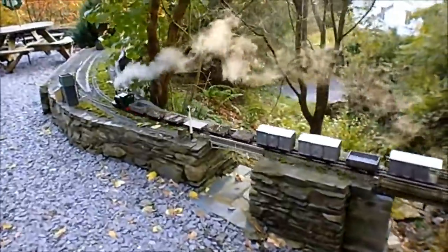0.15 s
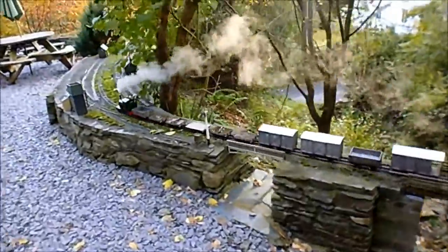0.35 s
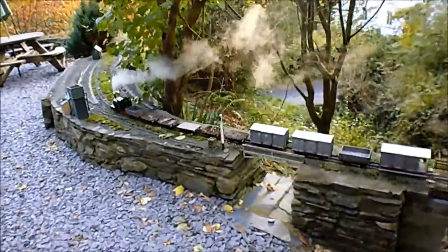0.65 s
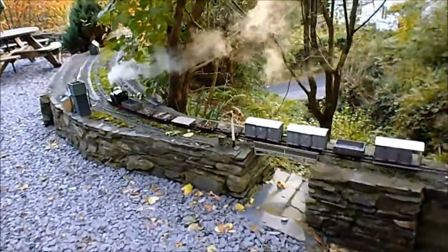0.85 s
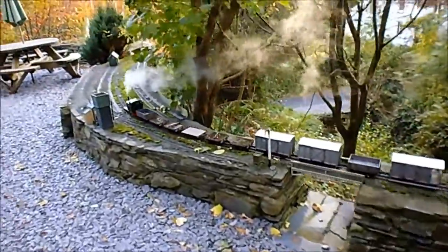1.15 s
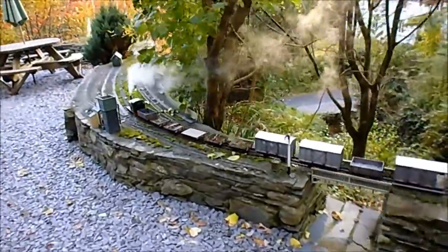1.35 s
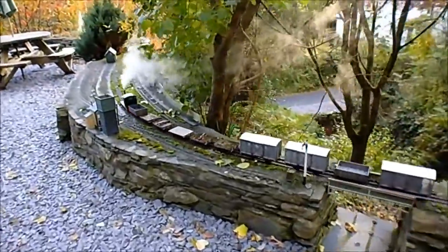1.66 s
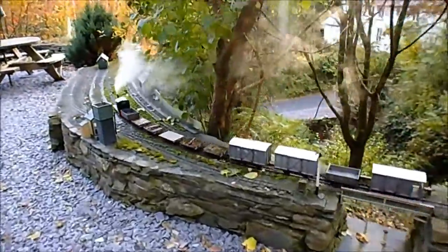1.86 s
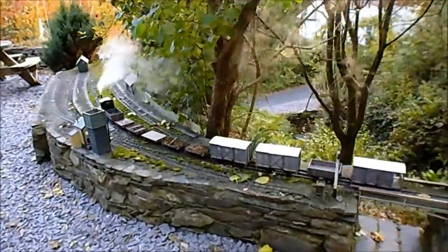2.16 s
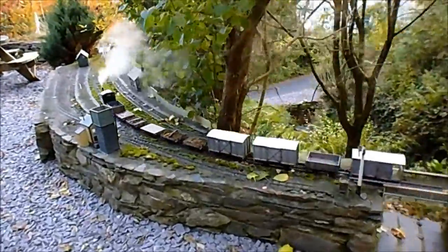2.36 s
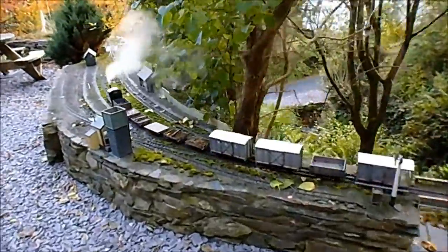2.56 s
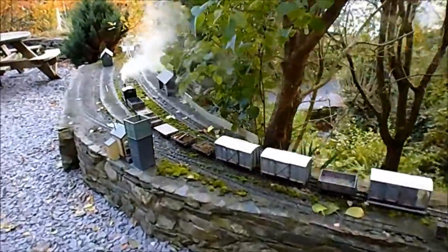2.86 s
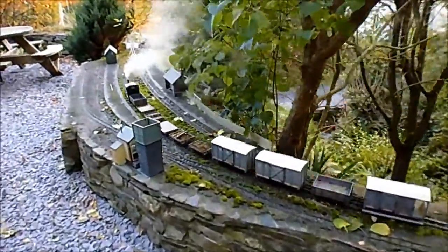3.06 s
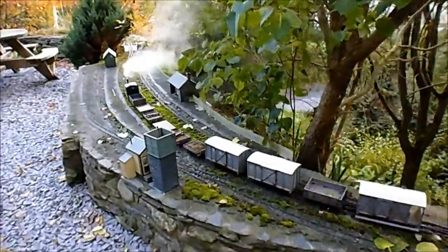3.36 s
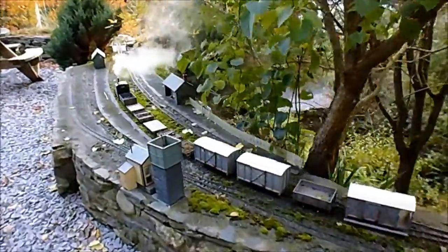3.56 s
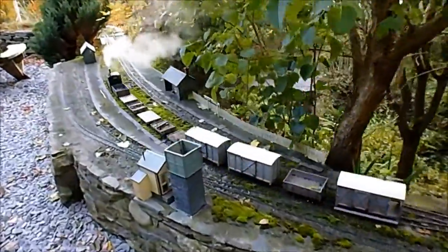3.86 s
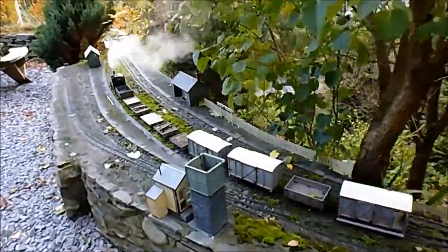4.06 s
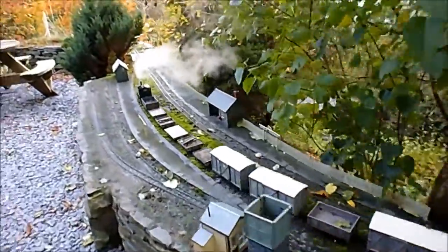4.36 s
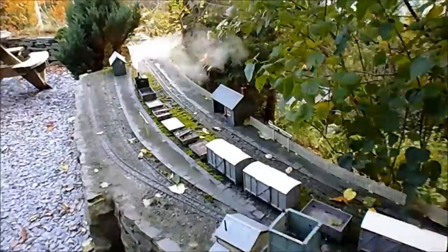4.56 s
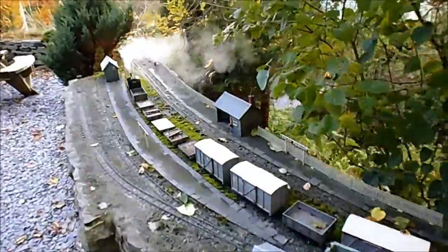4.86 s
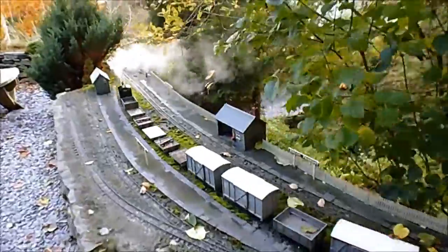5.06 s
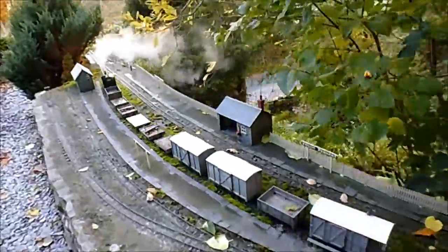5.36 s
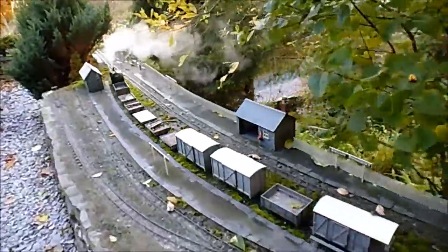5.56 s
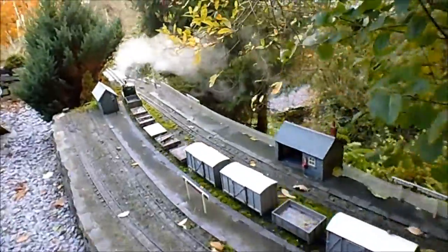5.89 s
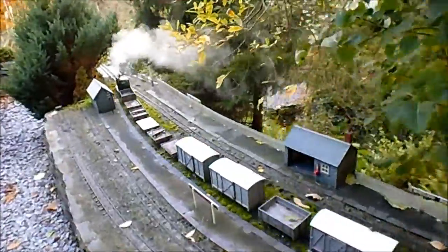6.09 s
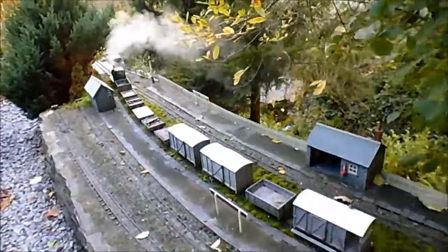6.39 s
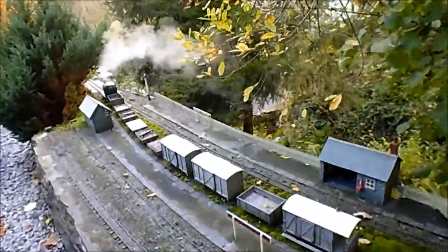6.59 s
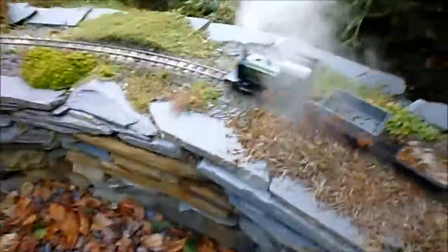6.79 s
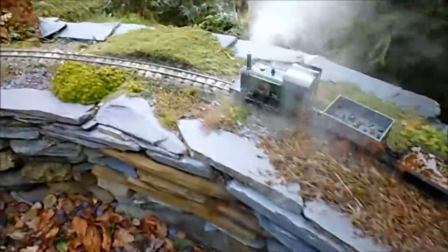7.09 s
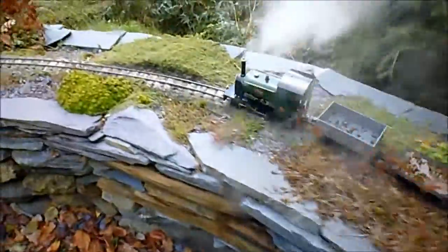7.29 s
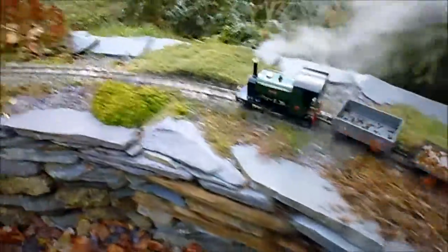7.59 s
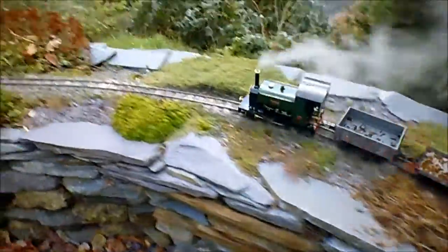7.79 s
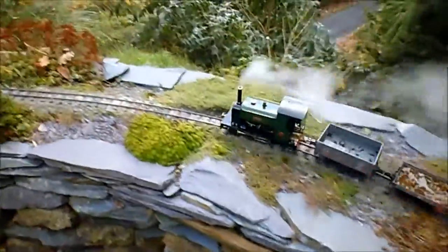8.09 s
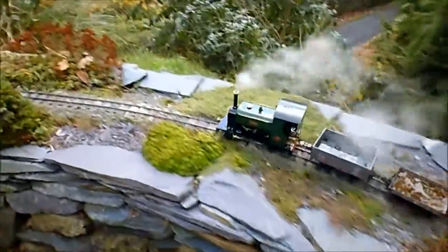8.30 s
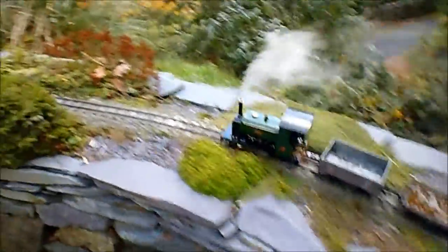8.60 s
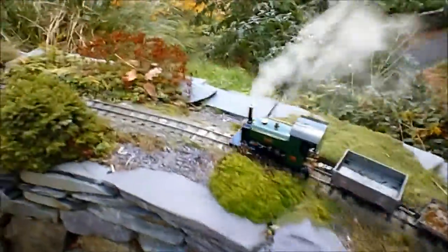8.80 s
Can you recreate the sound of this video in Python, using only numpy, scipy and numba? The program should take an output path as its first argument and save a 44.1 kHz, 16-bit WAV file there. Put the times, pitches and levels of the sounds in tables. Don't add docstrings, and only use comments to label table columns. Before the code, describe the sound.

Outdoors, a small live-steam engine gives a wavering, hollow burner hum with steady steam hiss. Light wheel ticks, metallic clicks and boxy wagon knocks grow dense as the wagons pass near the handheld microphone, with the track bed thumping. At about 6.7 seconds the scene cuts abruptly to the engine close up: stronger burner tone, whistling steam and small rod clicks, without the heavy knocking.

```python
import sys
import numpy as np
from scipy import signal
from scipy.fft import rfft, irfft, next_fast_len
from scipy.io import wavfile
from scipy.ndimage import uniform_filter1d
from numba import njit

SR = 44100
rng = np.random.default_rng(int(sys.argv[2]) if len(sys.argv) > 2 else 0)


def gain_from_db(level_db):
    decades = np.asarray(level_db, float) / 20
    return 10 ** decades


def wrap_up_sound(samples):
    columns = np.atleast_2d(samples).T
    tamed = np.clip(columns, -1, 1)
    steps = np.round(tamed * 32767).astype(np.int16)
    wavfile.write(sys.argv[1], SR, steps)


N = 394254
CUT_S = 6.712


def unit(x):
    return x / np.sqrt(np.mean(x ** 2))


def column(tables, k):
    t = np.arange(N) / SR
    far, near = (np.interp(t, np.array(c)[:, 0], np.array(c)[:, k]) for c in tables)
    return np.where(t < CUT_S, far, near)


def lowpass(x, order, hz):
    return signal.sosfilt(signal.butter(order, hz, fs=SR, output="sos"), x)


@njit
def svf(x, hz, width):
    y, band, low = np.empty(len(x)), 0., 0.
    for i in range(len(x)):
        g, k = np.tan(np.pi * hz[i] / SR), width / hz[i]
        v = (band + g * (x[i] - low)) / (1 + g * (g + k))
        band, low, y[i] = 2 * v - band, low + 2 * g * v, k * v
    return y


def ring(x, hz, width):
    hz = hz + np.zeros(len(x))
    each = width / np.sqrt(np.sqrt(2) - 1)
    return svf(svf(x, hz, each), hz, each)


def walk(rate):
    k = int(SR / rate)
    held = np.repeat(rng.standard_normal(N // 400), k)[:N]
    return unit(uniform_filter1d(uniform_filter1d(held, k), k))


def coloured(shape, flicker_db, rate):
    hz, db = np.transpose(shape)
    size = next_fast_len(N)
    f = np.maximum(np.arange(size // 2 + 1) * SR / size, 1)
    spec = rfft(rng.standard_normal(size)) * gain_from_db(np.interp(np.log(f), np.log(hz), db, right=-120))
    place = np.log2(f / hz[0]) * 2
    bands = [irfft(spec * np.clip(1 - abs(place - k), 0, 1), size)[:N] for k in range(10)]
    return unit(sum(b * gain_from_db(flicker_db * walk(rate)) for b in bands))


def ticks(rows, t60=0.023):
    rise_s = 0.002564
    out, t = np.zeros(N + 2048), np.arange(2048) / SR
    noise = rng.standard_normal((len(rows), 2048))
    for (s, db, hz, width), n in zip(rows, noise):
        burst = n * (1 - np.exp(-(t / rise_s) ** 2)) * np.exp(-np.log(1000) * t / t60)
        tick = ring(burst, hz, 1.46 * np.clip(width, .1, 2) * hz)
        start = int((s - rise_s / 2) * SR) % N
        out[start:start + 2048] += gain_from_db(db) * tick / abs(tick).max()
    return out[:N]


def blows(rows, rise_s, grit, crack):
    out, t = np.zeros(N + 8192), np.arange(8192) / SR
    noise = rng.standard_normal((len(rows), 8192))
    for (s, db, hz, t60, upper_hz, upper_db), n in zip(rows, noise):
        fade = np.exp(-np.log(1000) * t / max(t60, .004))
        force = grit * n * fade - (t == 0)
        lower = fade * np.sin(2 * np.pi * hz * t)
        upper = gain_from_db(upper_db) * fade ** 2 * np.sin(2 * np.pi * upper_hz * t)
        body = signal.fftconvolve(force, (lower + upper) * (1 - np.exp(-t / rise_s)))[:8192]
        body = np.diff(body, prepend=0)
        contact = crack * ring(n, 1.06 * hz, 0.86 * hz) * fade
        body = body / abs(body).max() + contact
        start = int(s * SR)
        out[start:start + 8192] += gain_from_db(db) * body / abs(body).max()
    return out[:N]


# t/s, level/dB, second flue tone over the first level/dB
FLAME_CURVES = [
    [(0.0, -35, -11), (0.5, -33, -6), (0.99, -36.5, -1.5), (1.57, -35, 3), (2.7, -34, -2.5),
     (2.99, -41.5, 5), (3.3, -37, -0.5), (4.2, -34.5, 0.5), (4.61, -32, -4), (5.0, -33, -2.5),
     (5.56, -33.5, -4), (5.95, -39, 0), (6.7, -42, -1.5)],
    [(6.72, -26.5, -6), (7.59, -29, -7), (7.94, -27.5, -4.5), (8.69, -26.5, -12), (8.94, -30, -17)],
]
# t/s, closeness of wagons level/dB, steam flow level/dB
TRAIN_CURVES = [
    [(0.0, 2, -1.5), (0.55, 2.5, -1.5), (0.88, -2, -1), (1.3, 0, 0.5), (2.39, 1.5, -2), (2.67, 1.5, 2.5),
     (3.0, 2.5, -2.5), (3.47, 2.5, 3.5), (3.97, 3, 0.5), (4.5, 4.5, 1), (5.06, 6.5, 3.5), (5.5, 4, 4),
     (6.1, 9.5, 5), (6.7, 8, 2.5)],
    [(6.72, 4, -3.5), (7.0, -0.5, -0.5), (7.7, 2.5, 0.5), (8.94, 2.5, 0.5)],
]
# f/Hz, level/dB (per Hz)
ROAR_SHAPE = [(200, -1), (400, -5.5), (600, 5), (1000, 3), (1400, 0), (1600, -24.5), (2200, -27),
              (4000, -43)]


def burner():
    width_hz = 43.8
    flame_db = column(FLAME_CURVES, 1)
    far = np.arange(N) / SR < CUT_S
    first_far = ring(rng.standard_normal(N), 786.6 * (1 + 0.007 * walk(14)), width_hz)
    first_near = ring(rng.standard_normal(N), 802.7 * (1 + 0.0119 * walk(4.4)), 1.17 * width_hz)
    first = unit(np.where(far, unit(first_far), unit(first_near)))
    second_hz = np.where(far, 1348, 1366) * (1 + 0.0054 * walk(9))
    second = unit(ring(rng.standard_normal(N), second_hz, 74.5))
    flue = first * gain_from_db(flame_db + 0.56 * walk(5.7))
    flue = flue + second * gain_from_db(flame_db + column(FLAME_CURVES, 2) + 1.3 * walk(12))
    roar_db = np.where(far, -36.5, -34) + 0.12 * column(TRAIN_CURVES, 1) + 0.69 * column(TRAIN_CURVES, 2)
    return flue + coloured(ROAR_SHAPE, 1.9, 14) * gain_from_db(roar_db)


# f/Hz, level/dB (per Hz)
HISS_SHAPE = [(900, -41), (1500, 9.5), (2000, 1.5), (2700, 2.5), (4700, -0.5), (6500, 1.5), (7600, -8.5),
              (9500, 4.5)]
# f/Hz, width f/Hz, far level/dB, near level/dB
JET_WHISTLES = [(2250, 100, -20, -14), (3080, 170, -14, -6.5), (5200, 120, -19, -15), (5830, 170, -15, -5),
                (6300, 350, -15, -8), (7300, 250, -16, -16)]
# t/s, length t/s, level/dB over the hiss
SPURTS = [(0.385, 0.052, 7.5), (0.47, 0.061, 8), (1.208, 0.047, 6), (1.87, 0.054, 9), (1.99, 0.043, 6),
          (3.093, 0.037, 5), (3.397, 0.059, 2), (3.482, 0.028, 6), (3.986, 0.041, 9.5), (4.23, 0.26, 4),
          (4.607, 0.035, 4.5), (7.006, 0.017, 7), (7.614, 0.057, 2)]
# t/s, f/Hz, level/dB, length t/s
FADING_WHISTLES = [
    (0, 5220, -52, .75),
    (0, 3120, -55, 1.3),
    (0, 5840, -54, 2.3),
    (6.712, 2710, -50, .9),
]


def steam():
    t = np.arange(N) / SR
    puffs_db = 0.9 * walk(45)
    for s, length, db in SPURTS:
        puffs_db = puffs_db + db * np.exp(-((t - s) / (length / 2)) ** 2)
    hiss = coloured(HISS_SHAPE, 1.2, 30)
    for hz, width_hz, far_db, near_db in JET_WHISTLES:
        tone = unit(ring(rng.standard_normal(N), hz * (1 + 0.007 * walk(8)), float(width_hz)))
        flutter_db = 1.5 * (walk(40) + walk(8))
        hiss = hiss + tone * gain_from_db(np.where(t >= CUT_S, near_db, far_db) + flutter_db)
    out = hiss * gain_from_db(-43.5 + column(TRAIN_CURVES, 2) + puffs_db)
    for s, hz, db, length in FADING_WHISTLES:
        tone = unit(ring(rng.standard_normal(N), hz, 120.)) * gain_from_db(db)
        out = out + tone * (t >= s) / (1 + ((t - s) / length) ** 4)
    return out


# f/Hz, level/dB (per Hz)
AIR_SHAPE = [(10, 1.5), (25, -1), (50, -3.5), (80, -4), (130, -13), (300, -33)]


def outdoor_air():
    return coloured(AIR_SHAPE, 1.4, 4.1) * gain_from_db(-49.5)


# f/Hz, level/dB (per Hz)
BED_SHAPE = [(60, -27.5), (110, -7.5), (185, -2.5), (250, -4.5), (330, -4.5), (420, -5.5), (520, -7.5),
             (900, -39.5)]


def bed_drumming():
    return coloured(BED_SHAPE, 2.5, 14) * gain_from_db(-42 + column(TRAIN_CURVES, 1))


def rattle():
    per_s = 130
    pick = rng.random((1400, 3))
    s = np.cumsum(-np.log(pick[:, 0]) / per_s)
    size_db = np.minimum(-41 - 4.5 * np.log(pick[:, 1]), -29)
    rows = np.c_[s, size_db, 1500 * 5 ** pick[:, 2], np.full(len(s), .6)]
    return ticks(rows[s < N / SR], t60=0.012)


BODY_T60_S, LID_HZ = 0.015, 1796


def clatter():
    per_s = 45
    pick = rng.random((500, 3))
    s = np.cumsum(-np.log(pick[:, 0]) / per_s)
    size_db = -43 - 2.5 * np.log(pick[:, 1])
    hz = 450 * 3.61 ** pick[:, 2]
    rows = [(a, db, f, BODY_T60_S, LID_HZ, -15) for a, db, f in zip(s, size_db, hz) if a < N / SR]
    return blows(rows, rise_s=0.0015, grit=0.14, crack=1.6) * gain_from_db(1.92 * column(TRAIN_CURVES, 1))


# t/s, level/dB (peak)
JOINT_HITS = [(0.409, -19), (1.198, -28), (1.501, -23.5), (2.162, -24.5), (2.2912, -39), (2.5312, -25),
              (2.8255, -29), (3.304, -28), (3.453, -20.5), (3.8374, -22.5), (3.9712, -28), (4.5363, -22),
              (4.6666, -19), (4.863, -22.5), (4.971, -22.5), (5.01, -24.5), (5.1897, -28), (5.4186, -19.5),
              (5.571, -20.5), (5.704, -23.5), (5.8476, -21), (5.9407, -31), (5.9828, -22.5), (6.0731, -31),
              (6.4691, -17), (6.5656, -23.5), (6.6174, -22.5), (6.6359, -25)]


def rail_joints():
    return ticks([(*hit, 3200, 0.7) for hit in JOINT_HITS])


# t/s, level/dB (peak), ring f/Hz, lid
# ring level/dB
BODY_KNOCKS = [(0.411, -23, 790, -3), (2.291, -20, 2350, -10), (2.293, -14.5, 1350, -16),
               (2.768, -24, 750, -23), (2.775, -8, 1210, -1), (3.034, -15, 1000, -33),
               (3.123, -19.5, 780, -31), (3.455, -21, 780, -16), (6.657, -14.5, 850, -23),
               (4.25, -17, 1050, -19), (4.861, -8, 770, -13), (5.124, -6.5, 880, -16),
               (5.496, -17.5, 930, 2), (5.846, -11.5, 745, -29), (5.878, -4, 906, -22),
               (5.894, -11, 1310, -26), (5.996, -12.5, 930, -16), (6.051, -14, 666, -7),
               (6.075, -10, 765, -12), (6.174, -12, 734, -30), (6.187, -13, 970, -23),
               (6.266, -14.5, 780, -13), (6.303, -9.5, 1220, -12), (6.326, -10, 1000, -9),
               (6.413, -12, 920, -24), (6.471, -8, 1370, -29), (6.491, -17, 950, -17),
               (6.519, -17, 820, -9), (6.617, -9.5, 930, -33), (6.636, -12, 900, -5)]


def body_knocks():
    rows = [(s, db, hz, BODY_T60_S, LID_HZ, lid_db) for s, db, hz, lid_db in BODY_KNOCKS]
    return blows(rows, rise_s=0.0006, grit=0.15, crack=2.9)


# t/s, level/dB (peak), ring f/Hz
FLANGE_CLICKS = [(0.4525, -19.5, 6100), (0.588, -19.5, 6350), (0.607, -15.5, 6060), (0.7195, -22, 6180),
                 (1.084, -27.5, 6250), (1.1505, -22, 5870), (1.287, -22, 7550), (1.458, -22, 7500),
                 (1.949, -27.5, 5700), (2.437, -27, 5910), (2.629, -27, 6100), (2.777, -19.5, 6560),
                 (3.42, -25, 5790), (3.6653, -18, 7290), (3.6886, -26, 6310), (4.204, -19.5, 7320),
                 (4.253, -23.5, 5890), (4.4093, -26, 6820), (4.4716, -21, 7210), (4.9355, -20, 6100),
                 (5.12, -13, 6500), (5.214, -15.5, 7400), (6.4065, -20.5, 6210), (6.484, -16.5, 6450),
                 (7.444, -23, 6480), (7.726, -32, 6000), (7.896, -21.5, 6140), (7.92, -24.5, 5900),
                 (8.81, -26, 6260), (8.906, -17.5, 6580)]


def flanges():
    return ticks([(*click, 0.71) for click in FLANGE_CLICKS])


# t/s, level/dB (peak), ring f/Hz, t60 t/s
BED_THUMPS = [(0.761, -28.5, 166, 0.081), (2.214, -28, 153, 0.064), (2.776, -11.5, 181, 0.022),
              (3.995, -18, 260, 0.092), (4.018, -28, 129, 0.065), (4.123, -22, 258, 0.05),
              (4.244, -22, 240, 0.039), (4.287, -23.5, 245, 0.077), (4.604, -20, 230, 0.045),
              (4.916, -24, 200, 0.062), (5.119, -12.5, 210, 0.016), (5.518, -26, 222, 0.12),
              (5.829, -17.5, 194, 0.071), (5.846, -25, 222, 0.14), (5.875, -14.5, 260, 0.049),
              (5.975, -19, 213, 0.14), (5.997, -15, 219, 0.039), (6.05, -12.5, 220, 0.11),
              (6.134, -16.5, 302, 0.16), (6.254, -13, 172, 0.08), (6.27, -17.5, 294, 0.15),
              (6.302, -12.5, 183, 0.078), (6.322, -21.5, 228, 0.078), (6.39, -15, 170, 0.076),
              (6.414, -14.5, 225, 0.12), (6.467, -13.5, 238, 0.08), (6.499, -24, 228, 0.026),
              (6.562, -16, 185, 0.13), (6.617, -15, 208, 0.04), (6.698, -38, 266, 0.095)]


def bed_thumps():
    thumps = blows([(*hit, 414, -4.5) for hit in BED_THUMPS], rise_s=0.0051, grit=0.13, crack=10.8)
    return signal.sosfilt(signal.butter(2, 75, "high", fs=SR, output="sos"), thumps)


# t/s, level/dB (peak)
LINK_CLINKS = [(2.331, -30), (2.4985, -23.5), (2.846, -26.5), (4.812, -25), (5.258, -26), (5.3317, -27.5),
               (5.5195, -19.5), (5.6487, -21), (5.763, -19), (5.877, -19.5), (5.9234, -24), (6.0497, -21),
               (6.1437, -22.5), (6.2903, -18), (6.3036, -15), (6.7216, -21), (8.263, -25), (8.758, -22),
               (8.776, -18.5)]


def coupling_links():
    return ticks([(*clink, 3980, 0.45) for clink in LINK_CLINKS])


def camera_jolt():
    bump = (6.716, -29.5, 45.4, 0.14, 84.5, 1)  # t/s, level/dB, f/Hz, t60 t/s, upper f/Hz, upper level/dB
    return blows([bump], rise_s=0.0091, grit=.02, crack=0)


# t/s, level/dB (peak)
ROD_CLICKS = [(6.766, -27), (6.988, -23), (7.0575, -28), (7.174, -26), (7.2729, -20), (7.327, -16),
              (7.542, -23.5), (7.5853, -23), (7.612, -22), (7.793, -27), (7.85, -18), (7.955, -28),
              (8.089, -21.5), (8.329, -23.5), (8.3825, -27), (7.691, -26), (7.825, -25.5), (8.475, -28.5),
              (8.5593, -22.5), (8.689, -23.5), (8.8905, -26)]


def engine_rods():
    return ticks([(*click, 2760, 0.68) for click in ROD_CLICKS])


# f/Hz, width f/Hz, level/dB
WHEEL_RINGS = [(1990, 76, 6.5), (3160, 140, 5.5), (6300, 56, 6.5), (7160, 180, 19)]
# delay t/s, level/dB
STONE_ECHOES = [
    (.011, -13.5),
    (.017, -13),
    (.029, -33.5),
]


def train():
    hits = rattle() + rail_joints() + flanges() + coupling_links() + engine_rods()
    rings = sum(gain_from_db(db) * svf(hits, np.full(N, float(hz)), float(width_hz))
                for hz, width_hz, db in WHEEL_RINGS)
    hits = lowpass(hits + rings / 4, 4, 7400)
    hits = hits + lowpass(clatter() + body_knocks(), 3, 2360)
    hits = hits + sum(gain_from_db(db) * np.roll(hits, int(s * SR)) for s, db in STONE_ECHOES)
    return hits + bed_drumming() + bed_thumps()


def scene():
    return (burner() + steam() + outdoor_air() + train() + camera_jolt())[None]


def low_pass(x):
    return signal.sosfilt(signal.butter(12, 8790, fs=SR, output="sos"), x)


def record(dry):
    x = signal.sosfilt(signal.cheby1(14, .3, 7705, fs=SR, output="sos"), dry)
    return low_pass(x)


dry = scene()
out = record(dry)
wrap_up_sound(out)
```